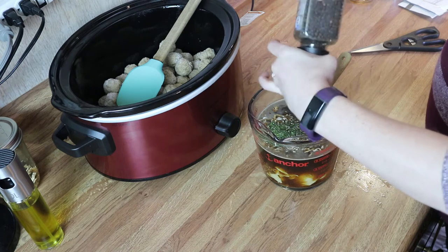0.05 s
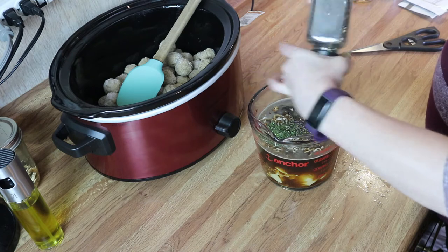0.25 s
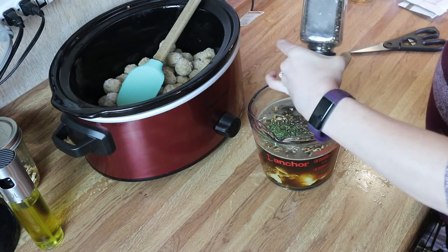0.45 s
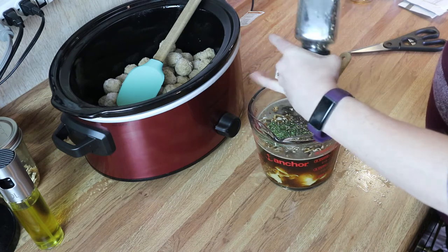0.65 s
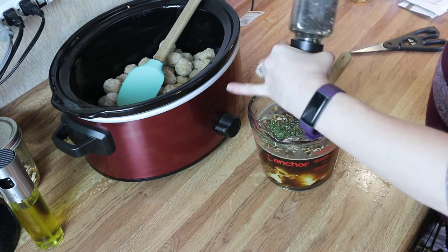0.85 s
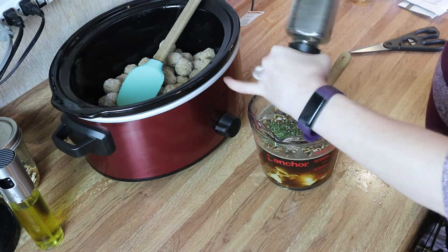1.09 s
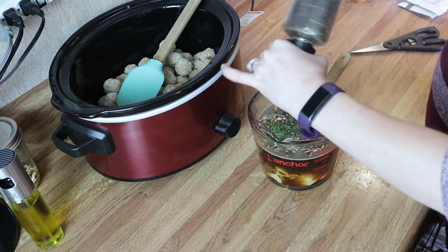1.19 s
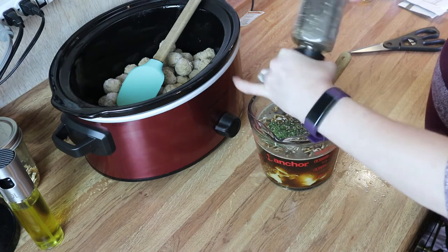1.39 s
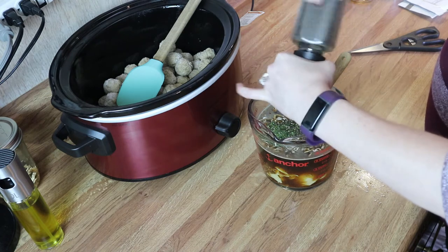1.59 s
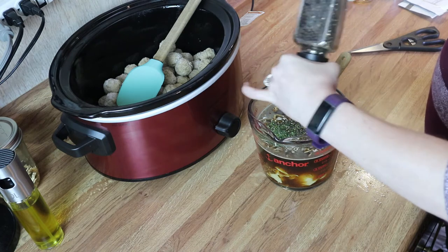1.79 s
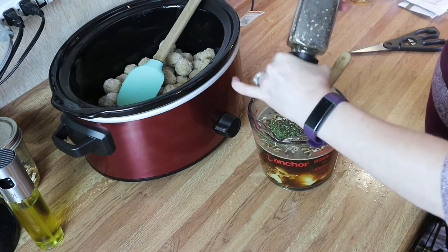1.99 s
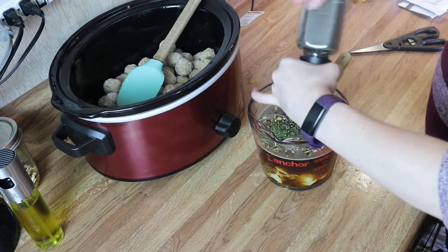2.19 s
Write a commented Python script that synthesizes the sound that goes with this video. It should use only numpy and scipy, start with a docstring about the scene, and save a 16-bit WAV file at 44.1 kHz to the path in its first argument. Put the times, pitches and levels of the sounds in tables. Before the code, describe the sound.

A plastic pepper grinder, close up, twisted in short gritty pushes. Faint rasping leads to a hard cluster of bright cracks around 0.2 s, with another snap near 0.36. A lull holds one thin tick at 0.65. Rasping resumes near 1.0, crackles densely from 1.15 to 1.35, then eases. More cracks come at 1.8, a clean knock at 1.94, final crunches, and faint scraping over low kitchen hum.

```python
"""A low appliance hum and the soft rush of a small kitchen come first, and soon a plastic burr rasps.
A disposable pepper grinder is twisted back and forth over a cup: noise bursts crack as peppercorns,
ringing the grinder's body; thin ticks and one clean knock, a sum of decaying sines, come from the burr.
Tiny pings and smooth noise make the rasp. Short reflections and a tail of noise answer the grinder,
and a gain control ducks at the loud cracks and creeps back."""
import sys
import numpy as np
from scipy import signal
from scipy.fft import rfft, irfft, next_fast_len
from scipy.io import wavfile

SR = 44100
rng = np.random.default_rng(int(sys.argv[2]) if len(sys.argv) > 2 else 0)


def dump_mix(stems):
    """Bounce the given channels to the path in sys.argv[1] as a 16-bit WAV at rate SR."""
    frames = np.atleast_2d(stems).T  # one column per channel
    limited = np.clip(frames, -1, 1)  # hard clip at full scale
    pcm = np.round(limited * 32767).astype(np.int16)
    wavfile.write(sys.argv[1], SR, pcm)


N = 99225  # length in samples

# Peppercorns cracking. Each row: start in seconds, level in dB, bass lift in dB, treble lift in dB,
# splintering time in ms, own pitch in Hz.
CRACKS = [(0.0721, -34.5, -10, -4.5, 2, 2480), (0.124, -31.5, -26, 5, 3.3, 10800),
          (0.167, -30.5, 3, 14.5, 2, 2430), (0.2022, -11.5, -7, -10, 3.8, 3630),
          (.2103, -2, 6, 11.5, 1.23, 1044), (.2135, -11, -1, 20, 10, 2140), (.2252, -8, 8.5, -1, 1.8, 4700),
          (0.2309, -3, 0, -1, 1.3, 4640), (.2355, -20, -5, 6, 3.8, 4480), (0.356, -11, 7, 1, 1.4, 3300),
          (1.0098, -15, 0, -1, 2.2, 3460), (1.1547, -12.5, -3.5, -6, 1.1, 4130),
          (1.1617, -16.5, 4, -5, 1.3, 6100), (1.1682, -21.5, 15.5, -9, 2, 4390),
          (1.184, -9.5, 2, -10, 1.9, 4200), (1.2038, -4, 4.5, -0.5, 1.4, 4460),
          (1.2217, -6.5, -1.5, 9, 1.9, 4300), (1.23, -8.5, 3.5, 5.5, 2.1, 5700),
          (1.2441, -13.5, 3, 2, 2, 4330), (1.267, -13.5, 1, 1, 3.3, 4900), (1.273, -13.5, 6, -1, 2, 2480),
          (1.2825, -14.5, 4, 11, 1.8, 4700), (1.3023, -18, 8, -10, 1.1, 4270),
          (1.3361, -15, 3.5, 3.5, 2.9, 4700), (1.518, -23, 3, 2, 3.9, 6050),
          (1.5328, -25.5, 19.5, 7, 1.1, 5900), (1.6301, -31, 2, -3, 3.4, 2520),
          (1.6415, -30, -6, -20.5, 3.7, 3050), (1.6641, -25, 2, -5, 6, 2450),
          (1.686, -17, 17, -2, 1.5, 1920), (1.6942, -19.5, 1, -1, 3.2, 3720),
          (1.791, -15.5, 5, 14, 1.3, 6050), (1.7969, -13, 3, -15, 2.1, 3150), (1.805, -8, 0, 4, 2.64, 2210),
          (1.9555, -11.5, 4, -12.5, 3.1, 3227), (1.9723, -9.5, 4, 12, 2, 3860),
          (2.0318, -18, 0, -7, 2.2, 3670)]
# Colour of the bare crack. Each row: frequency in Hz, gain in dB.
CRACK_COLOUR = [(40, -63), (250, -23), (430, -10), (680, -8.5), (840, -15.5), (1050, -5), (2500, 0.5),
                (4200, 3.5), (6000, 0.5), (8000, -6.5), (11000, -8.5), (15500, -21)]
BASS_HZ, TREBLE_HZ = 2480, 7000  # hinges of each crack's bass and treble lift
CRACK_RING_DB = 1.5  # body resonances in a crack
# The middle of the spectrum crosses the body late: longest delay, its centre and its width.
SPREAD_MS, SPREAD_HZ, SPREAD_WIDTH_HZ = 1.027, 4606, 1970


def cracks(size=4096):
    """Breaking corns ring the grinder's body, each favouring a pitch of its own."""
    out = np.zeros(N + size)
    f = np.fft.rfftfreq(size, 1 / SR)
    bass = 1 / (1 + (f / BASS_HZ) ** 4)
    treble = 1 - 1 / (1 + (f / TREBLE_HZ) ** 6)
    delay_ms = SPREAD_MS * np.exp(-((f - SPREAD_HZ) / SPREAD_WIDTH_HZ) ** 2)
    for start, db, bass_db, treble_db, splinter_ms, pitch_hz in CRACKS:
        colour = amp(along(CRACK_COLOUR, f) + bass_db * bass + treble_db * treble)
        colour = colour * body(f, CRACK_RING_DB) * accent(f, pitch_hz)
        out[round(start * SR):][:size] += snap(db, splinter_ms, colour, delay_ms)
    return out[:N]


BREAK_MS = 0.13  # the first clean break holds as much energy as this much splintering
CRUMBLE_DB, CRUMBLE_S = -2, 0.0098  # crumbs: energy against the splinters, time constant
CRACK_S = 0.003  # a break's level is its energy spread over this time


def snap(db, splinter_ms, gain, delay_ms=0):
    """A clean break, a burst of splinters and their dying crumbs, all through one colour."""
    size = 2 * (len(gain) - 1)
    t = np.arange(size) / SR
    noise = rng.standard_normal((2, size))
    splinters = normed(noise[0] * np.exp(-(t * 1000 / splinter_ms) ** 3) * (t > 0))
    crumbs = amp(CRUMBLE_DB) * normed(noise[1] * np.exp(-t / CRUMBLE_S))
    burst = np.sqrt(BREAK_MS) * (t == 0) + np.sqrt(splinter_ms) * (splinters + crumbs)
    # Summing the delay over frequency gives the phase that makes each band late.
    late = np.exp(-2j * np.pi * np.cumsum(delay_ms / 1000) * SR / size)
    coloured = irfft(rfft(burst) * causal(gain) * late)
    fade = np.cos(np.pi / 2 * t / t[-1])
    return amp(db) * np.sqrt(CRACK_S * SR) * normed(fade * coloured)


ACCENT_DB, ACCENT_Q = 6.5, 7  # power added at the favoured pitch, against the plain colour; sharpness


def accent(f, hz):
    """Gain of the one resonance that a break favours."""
    detune = 2 * ACCENT_Q * (f / hz - 1)
    return np.sqrt(1 + amp(ACCENT_DB) ** 2 / (1 + detune ** 2))


# Resonances of the grinder. Each row: frequency in Hz, width in Hz, level in dB.
BODY = [(948, 35, -1), (1180, 260, -6.5), (1887, 240, -10.5), (2420, 170, -11), (3082, 140, -1.5),
        (3767, 180, -5.5), (4266, 160, -6), (4700, 810, -11.5), (5940, 480, -13.5), (10800, 150, -1),
        (13100, 360, -10)]


def body(f, ring_db):
    """Gain of the grinder: a direct path plus its resonances."""
    ring = sum(amp(db) * 1j * f * width / (hz * hz - f * f + 1j * f * width) for hz, width, db in BODY)
    return abs(1 + amp(ring_db) * ring)


# Plastic catching and letting go. Each row: start in seconds, level in dB, splintering time in ms.
TICKS = [(0.351, -12.5, 3.3), (.6510, -13.5, 1.9), (1.7737, -15, 2.4)]
# Colour of the ticks and of the knock's snap. Each row: frequency in Hz, gain in dB.
TICK_COLOUR = [(100, -50), (700, -27.5), (2350, -14), (3350, -16.5), (3900, -6.5), (5600, -11.5),
               (7200, -9.5), (10500, -11), (15500, -19.5)]
TICK_HZ = 6050  # pitch that every tick favours


def ticks(size=4096):
    """The plastic catches and lets go: breaks without the body's ring, thin and bright."""
    out = np.zeros(N + size)
    f = np.fft.rfftfreq(size, 1 / SR)
    colour = amp(along(TICK_COLOUR, f)) * accent(f, TICK_HZ)
    for start, db, splinter_ms in TICKS:
        out[round(start * SR):][:size] += snap(db, splinter_ms, colour)
    return out[:N]


# What the knock rings with. Each row: frequency in Hz, level in dB, 60 dB decay time in seconds.
KNOCK_MODES = [(1190, -6.5, 0.015), (1800, -9.5, 0.0092), (2490, -4.5, 0.01), (3740, 0, 0.02),
               (4390, -1.5, 0.013), (5460, -0.5, 0.011), (6900, -4, 0.0099), (11000, -6, 0.0068)]
KNOCK_AT_S, KNOCK_DB = 1.9377, -3.5
KNOCK_RISE_S, KNOCK_SNAP_DB = 0.0004, -9  # rise of the ring; snap against the ring


def knock(size=4096):
    """The burr snaps free: one blow with a small snap, ringing in separate modes."""
    out = np.zeros(N + size)
    t = np.arange(size) / SR
    f = np.fft.rfftfreq(size, 1 / SR)
    ring = sum(amp(db - 60 * t / t60) * np.sin(2 * np.pi * (hz * t + rng.random()))
               for hz, db, t60 in KNOCK_MODES)
    ring = np.sqrt(CRACK_S * SR) * normed(ring * (1 - np.exp(-t / KNOCK_RISE_S)))
    blow = ring + snap(KNOCK_SNAP_DB, 1, amp(along(TICK_COLOUR, f)))
    out[round(KNOCK_AT_S * SR):][:size] += amp(KNOCK_DB) * blow
    return out[:N]


# Rasp of the burr, one list for each push of the hand. Each row: time in seconds, level in dB.
PUSHES = [
    [(.035, -50), (.075, -35.5), (.10, -36), (.145, -47), (.195, -33), (.235, -15), (.255, -35.5),
     (.33, -63)],
    [(.955, -62), (.975, -37), (1.01, -31.5), (1.05, -36), (1.075, -55)],
    [(1.09, -53), (1.135, -34), (1.155, -22), (1.182, -30.5), (1.352, -28), (1.385, -38.5), (1.44, -46.5)],
    [(1.45, -45.5), (1.50, -37.5), (1.53, -28.5), (1.58, -35.5), (1.62, -46)],
    [(1.645, -42.5), (1.69, -23.5), (1.72, -36), (1.765, -45.5), (1.80, -20.5), (1.83, -34.5),
     (1.90, -36.5), (1.93, -44)],
    [(1.939, -36), (1.97, -22), (2.001, -35.5), (2.04, -32), (2.07, -48.5)],
    [(2.15, -49), (2.19, -37), (2.25, -33.5)],
]
# Colour of the rasp. Each row: frequency in Hz, gain in dB.
RASP_COLOUR = [(150, -22), (600, 1), (1200, -8), (2400, -2.5), (4200, 2.5), (6000, 0.5), (8000, -3),
               (11500, -4), (15500, -9)]
RUB_DB, RASP_RING_DB = 2, 3.5  # smooth rubbing against the grit; body resonances in the rasp


def rasp():
    """Grit and rubbing plastic excite the body as long as the hand pushes."""
    t = np.arange(N) / SR
    level = sum(amp(np.interp(t, *np.transpose(push), left=-120, right=-120)) for push in PUSHES)
    force = unit(grit()) + amp(RUB_DB) * rng.standard_normal(N)
    f = np.fft.rfftfreq(2048, 1 / SR)
    answer = irfft(causal(amp(along(RASP_COLOUR, f)) * body(f, RASP_RING_DB)))
    return level * unit(signal.fftconvolve(force, answer)[:N])


GRAINS_PER_S, GRAIN_SPREAD_DB = 1800, 2.5  # density; scale of the random size
GRAIN_HZ, GRAIN_S = (864, 15080), 0.00085  # range of pitches; time constant of the ring


def grit(size=256):
    """Tiny fragments ping at random, each with its own size and pitch."""
    t = np.arange(size) / SR
    count = int(GRAINS_PER_S * N / SR)
    when, pitch, chance = rng.random((count, 3)).T[:, :, None]
    sizes = amp(GRAIN_SPREAD_DB * np.minimum(-np.log(1 - chance), 4))  # many small, few large
    hz = np.interp(pitch, [0, 1], GRAIN_HZ)
    pings = sizes * np.exp(-t / GRAIN_S) * np.sin(2 * np.pi * hz * t)
    places = (when * N).astype(int) + np.arange(size)
    return np.bincount(places.ravel(), pings.ravel(), N)[:N]


# Decay of the room. Each row: frequency in Hz, 60 dB decay time in seconds.
ROOM = [(200, 0.18), (1000, 0.55), (4000, 0.32), (9000, 0.33), (15000, 0.28)]
ROOM_DB, ROOM_DELAY_S = -13.5, 0.012  # energy of the tail against the direct sound; its start
EARLY_DB, EARLY_FROM_S, EARLY_SPAN_S = -12.5, 0.0027, 0.0074  # reflections from things close by


def kitchen(x, count=10):
    """Close reflections and a tail that lasts longest in the mids, drawn anew for each stretch."""
    out = np.zeros(2 * N)
    for part in np.array_split(np.arange(N), count):
        hz, t, bands = signal.stft(rng.standard_normal(SR // 2), SR, nperseg=256)
        decay = amp(-60 * t / along(ROOM, hz)[:, None])
        tail = signal.istft(bands * decay, SR, nperseg=256)[1]
        tail *= np.arange(len(tail)) / SR > ROOM_DELAY_S
        delays = ((EARLY_FROM_S + EARLY_SPAN_S * rng.random(size=12)) * SR).astype(int)
        early = np.bincount(delays, rng.standard_normal(len(delays)), len(tail))
        answer = amp(ROOM_DB) * tail / np.linalg.norm(tail)
        answer = answer + amp(EARLY_DB) * early / np.linalg.norm(early)
        echo = signal.fftconvolve(x[part], answer)
        out[part[0]:][:len(echo)] += echo
    return out[:N]


# Appliance hum. Each row: frequency in Hz, rms level in dB before the gain control.
HUM = [(59.7, -53.5), (119.5, -50), (172.3, -56.5), (200, -59)]
# Colour of the room's rush. Each row: frequency in Hz, gain in dB.
AIR_COLOUR = [(25, -31), (50, -21), (90, -13.5), (150, -12), (330, -7), (620, -11.5), (750, -18),
              (1300, -15), (1550, -23.5), (4000, -30.5), (16000, -42)]
AIR_DB = -45.5  # rms before the gain control


def appliances():
    """Steady sines hum under the soft rush of the room, a coloured noise."""
    t = np.arange(N) / SR
    hum = sum(np.sqrt(2) * amp(db) * np.sin(2 * np.pi * (hz * t + rng.random())) for hz, db in HUM)
    air = filtered(rng.standard_normal(N), lambda f: amp(along(AIR_COLOUR, f)))
    return hum + amp(AIR_DB) * unit(air)


def scene():
    """The grinder, the kitchen's answer to it and the appliances."""
    grinder = cracks() + ticks() + knock() + rasp()
    return (grinder + kitchen(grinder) + appliances())[None]


AGC_THRESHOLD_DB, AGC_SLOPE = -16, 0.68  # dB turned down for each dB over the threshold
AGC_WINDOW_S, AGC_ATTACK_S, AGC_RELEASE_DB_PER_S = 0.0044, 0.0022, 9.5
CLIP_TOP, TOP_HZ = 0.56, 16000  # ceiling of the soft clip; band limit


def record(dry):
    """Gain control ducks at loud cracks and creeps back; peaks clip softly; the band is limited."""
    x = dry[0]
    released = AGC_RELEASE_DB_PER_S * np.arange(N) / SR
    level_db = 10 * np.log10(lag(x ** 2, AGC_WINDOW_S) + 1e-12)
    over_db = np.maximum(level_db - AGC_THRESHOLD_DB, 0)
    # The running maximum holds each duck while the release lets it fall in a straight line.
    duck_db = np.maximum.accumulate(AGC_SLOPE * over_db + released) - released
    x = x * amp(-lag(duck_db, AGC_ATTACK_S))
    x = x / (1 + abs(x / CLIP_TOP) ** 6) ** (1 / 6)
    return filtered(x, lambda f: f < TOP_HZ)[None]


def amp(db):
    """Amplitude factor of a level in dB."""
    return 10 ** (np.asarray(db) / 20)


def unit(x):
    """x with an rms of one."""
    return x / np.sqrt(np.mean(x ** 2) + 1e-20)


def normed(x):
    """x with unit energy."""
    return x / (np.linalg.norm(x) + 1e-12)


def along(points, hz):
    """A curve through (Hz, value) points on a log frequency axis."""
    f, values = np.transpose(points)
    return np.interp(np.log(hz + 1), np.log(f + 1), values)


def filtered(x, response):
    """x through a response given as a function of frequency."""
    m = next_fast_len(len(x) + SR // 4)
    return irfft(rfft(x, m) * response(np.fft.rfftfreq(m, 1 / SR)), m)[:len(x)]


def causal(gain):
    """The minimum-phase response with this gain: its cepstrum folded onto positive time."""
    cepstrum = irfft(np.log(np.maximum(gain, 1e-6)))
    half = len(cepstrum) // 2
    cepstrum[1:half] *= 2
    cepstrum[half + 1:] = 0
    return np.exp(rfft(cepstrum))


def lag(x, seconds):
    """x followed with a time constant."""
    keep = np.exp(-1 / (seconds * SR))
    return signal.lfilter([1 - keep], [1, -keep], x)


dry = scene()
out = record(dry)
dump_mix(out)
```